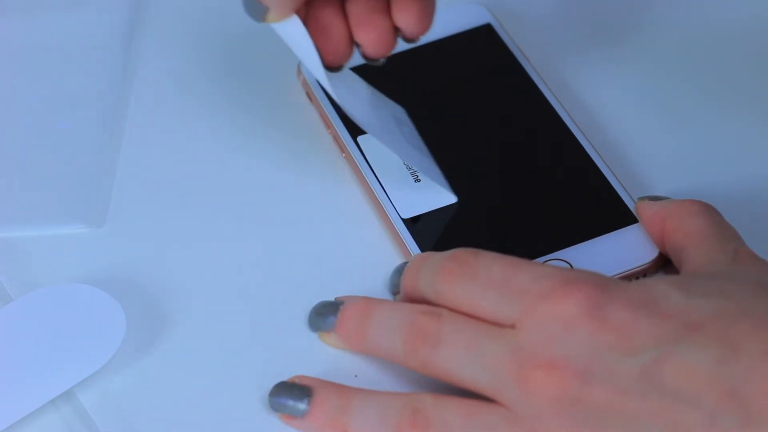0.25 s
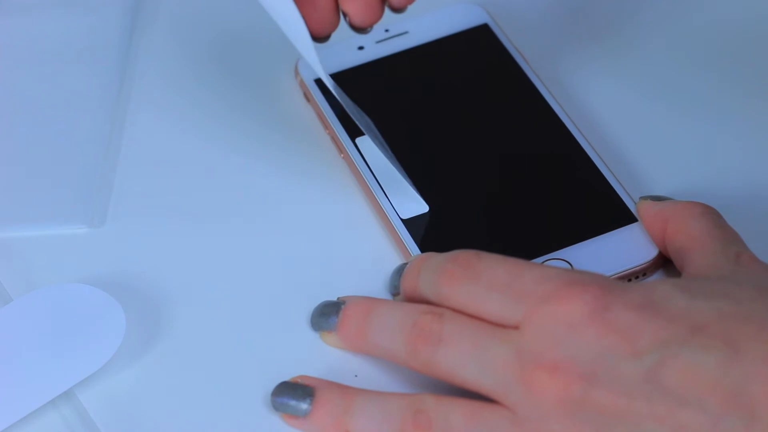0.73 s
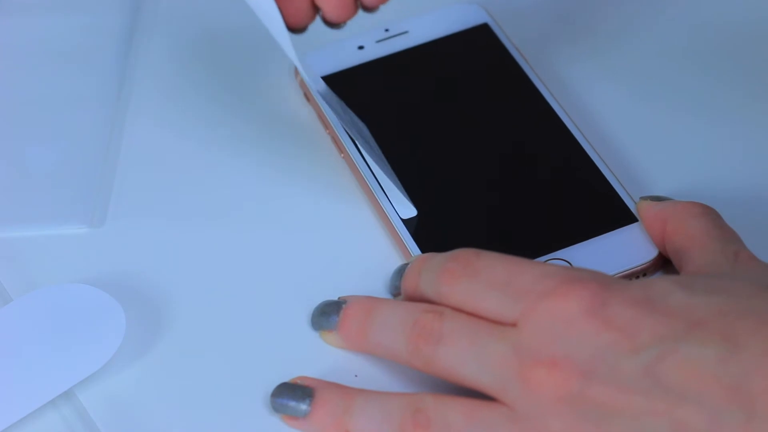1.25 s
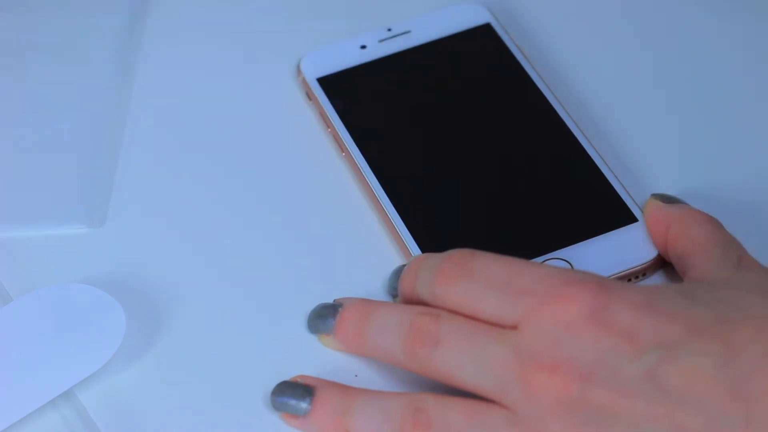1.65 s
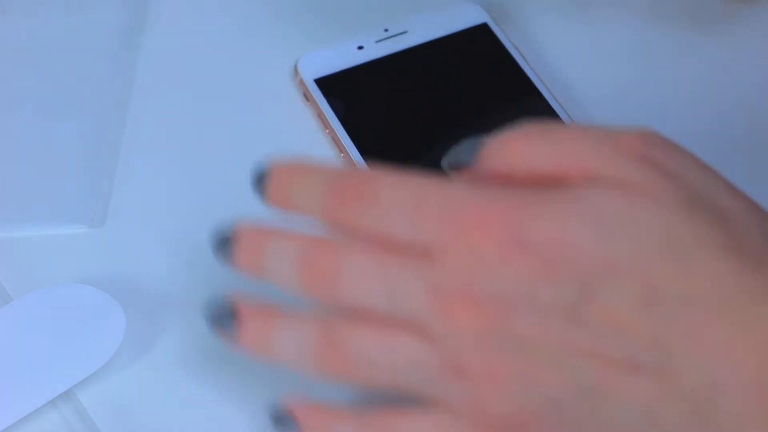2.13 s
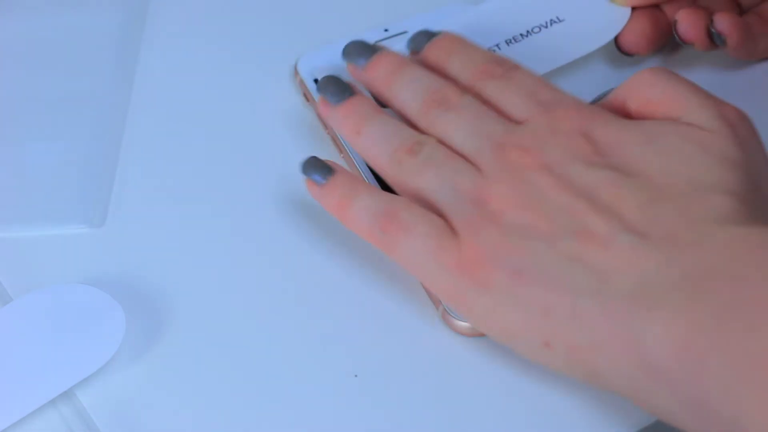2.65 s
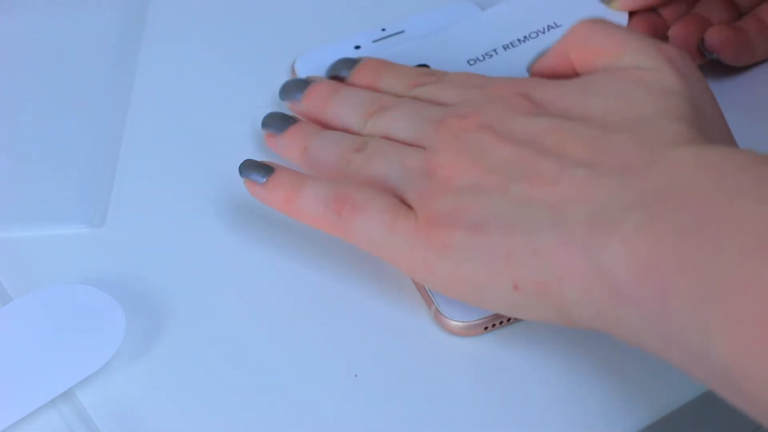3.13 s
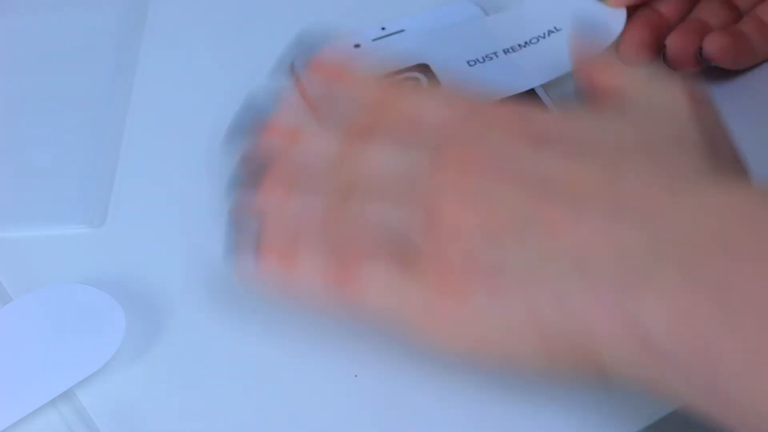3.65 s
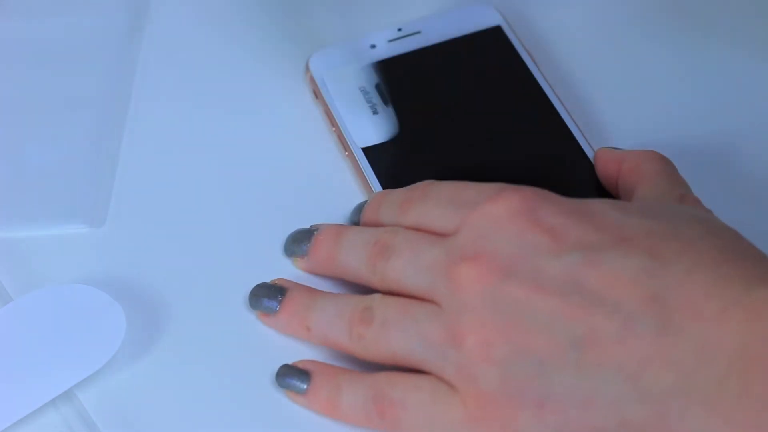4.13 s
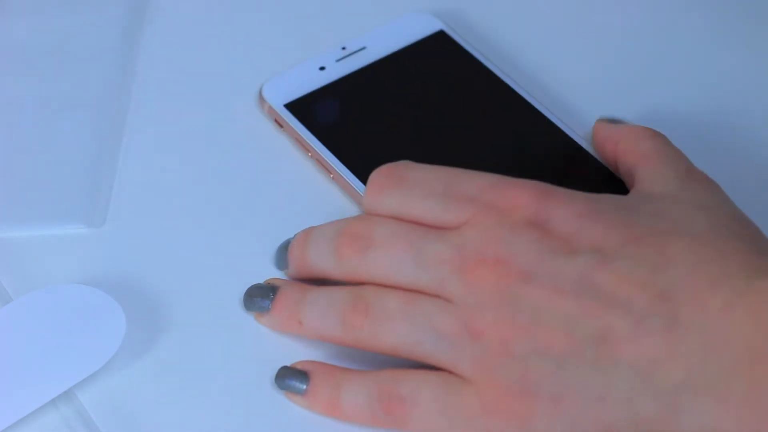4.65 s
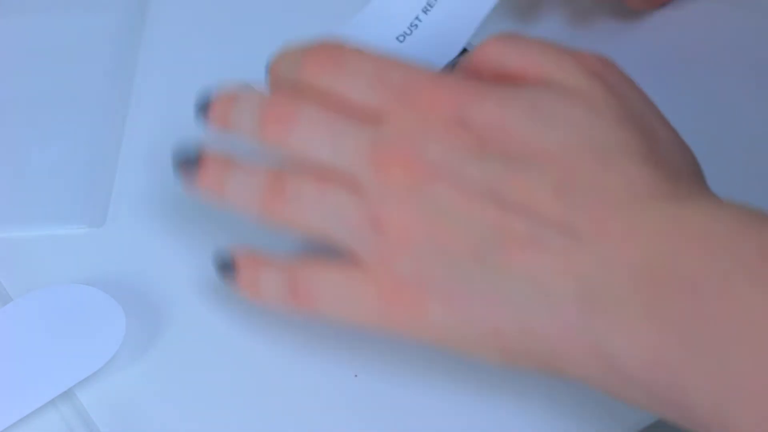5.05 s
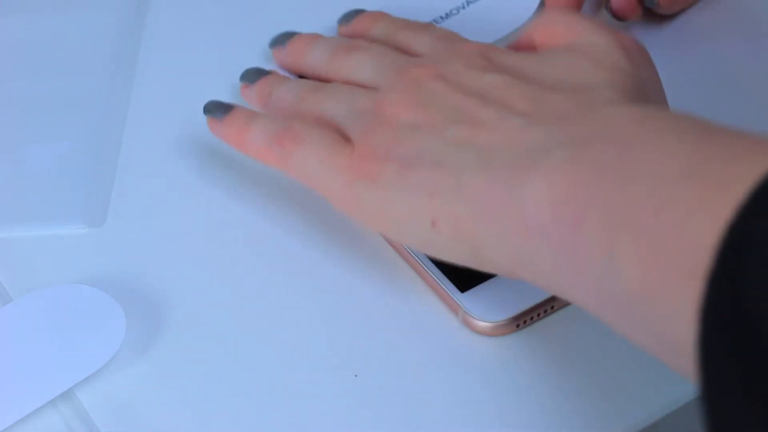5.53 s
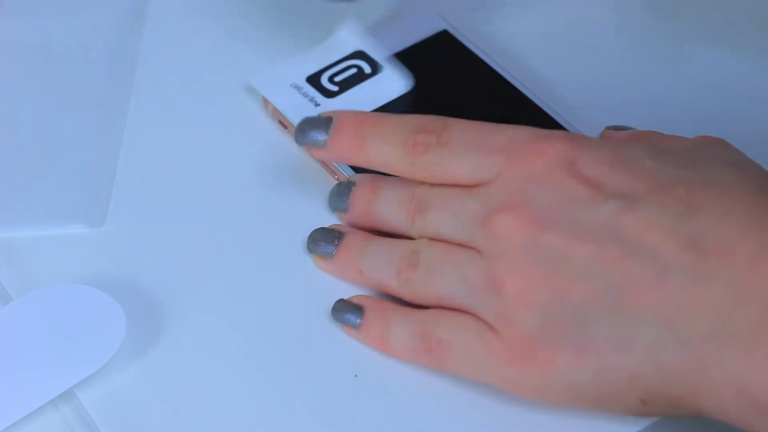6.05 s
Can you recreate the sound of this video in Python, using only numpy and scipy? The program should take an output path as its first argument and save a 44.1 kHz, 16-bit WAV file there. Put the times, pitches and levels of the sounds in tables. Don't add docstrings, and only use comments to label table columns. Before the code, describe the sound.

A phone lies on a table while a sticky sheet is pressed on and pulled off. Small ticks and one low, loud snap come first, then spaced bright knocks, each answered by short room reverb. A brief burst of dense snaps tears the sheet loose; the phone scuffs softly. More knocks lead to a second, brighter rip. Close stereo pickup, faint hiss.

```python
import sys
import numpy as np
from scipy import signal
from scipy.fft import rfft, irfft
from scipy.io import wavfile
from scipy.ndimage import uniform_filter1d

SR = 44100
rng = np.random.default_rng(int(sys.argv[2]) if len(sys.argv) > 2 else 0)


def pcm_store(signal):
    levels = np.round(np.clip(np.atleast_2d(signal), -1, 1) * 32767)
    wavfile.write(sys.argv[1], SR, levels.astype(np.int16).T)


def makeup_ratio(level_db):
    decades = np.asarray(level_db, float) / 20
    return 10 ** decades


N = 277830
LEAD = SR // 4
LONG = N + LEAD
EARLIER_S = -0.06

# start_s, rise_s, hold_s, fall_s, crackle level_db
PEELS = [
    (4.026, .045, 0.053, 0.085, -28.5),
    (5.985, 0.031, 0.19, 0.05, -31.5),
]


def at_hz(points, hz):
    table_hz, value = np.array(points).T[:2]
    return np.interp(np.log(hz + 1), np.log(table_hz), value)


def place(s):
    return int(round(s * SR)) + LEAD


def coloured(x, spectrum):
    size = x.shape[-1]
    return irfft(rfft(x) * makeup_ratio(at_hz(spectrum, np.fft.rfftfreq(size, 1 / SR))), size)


def ring(x, hz, t60):
    radius, angle = makeup_ratio(-60 / (t60 * SR)), 2 * np.pi * hz / SR
    return signal.lfilter([0, np.sin(angle)], [1, -2 * radius * np.cos(angle), radius ** 2], x + 1e-18)


def pair(size, likeness):
    alike = np.clip(at_hz(likeness, np.fft.rfftfreq(size, 1 / SR)), 0, 1)
    mid, side = rfft(rng.standard_normal((2, size)))
    mid, side = np.sqrt(1 + alike) * mid, np.sqrt(1 - alike) * side
    return irfft([mid + side, mid - side], size)


def grains(per_s, spread_db):
    present = rng.random(LONG) < per_s / SR
    size = makeup_ratio(spread_db * np.minimum(rng.exponential(1, LONG), 4))
    clicks = present * size * rng.choice([-1, 1], LONG)
    return clicks / np.std(clicks)


def stroke(t, start, rise, hold, fall):
    return np.interp(t - start, np.cumsum([0, rise, hold, fall]), [0, 1, 1, 0], left=-1, right=-1)


def envelope(strokes):
    edge_db = -11.5
    t, gain = (np.arange(LONG) - LEAD) / SR, np.zeros(LONG)
    for *shape, level_db in strokes:
        effort = stroke(t, *shape)
        gain += (effort >= 0) * makeup_ratio(level_db + edge_db * (1 - effort))
    return uniform_filter1d(gain, size=400)


def snap_rows():
    # time_s, peak_db, centre_hz, thrown_db (share thrown into the room)
    lone_snaps = [
        (.026, -31.5, 7900, -2),
        (.506, -35.5, 7760, -1),
        (.599, -32, 7800, -4),
        (1.392, -19.5, 6600, 13.5),
        (1.3957, -5.5, 2980, 1.5),
        (1.6648, -38, 5500, -6),
        (3.4647, -35.5, 5200, -5),
        (4.9059, -31.5, 3350, 6.5),
        (4.9192, -40, 3300, -6),
    ]
    # time_s, peak_db, centre_hz, thrown_db
    nail_ticks = [
        (2.869, -41, 9000, 0),
        (3.4702, -41, 5900, 7),
        (3.829, -45.5, 3600, 7.5),
        (5.365, -43, 2600, 2),
    ]
    # peak_db, centre_hz, thrown_db
    earlier_snap = (-23, 9100, 4.2)
    # time_s, peak_db, centre_hz
    first_rip = [(3.9939, -29, 7100), (3.9994, -25, 4030), (4.0103, -24.5, 4700), (4.0147, -16.5, 8000),
                 (4.0301, -19, 4800), (4.0402, -18, 12000), (4.044, -12, 4500), (4.0466, -13, 5500),
                 (4.0622, -21, 3920), (4.0636, -12.5, 4300), (4.0665, -11, 4630), (4.0933, -18, 4000),
                 (4.1198, -9.5, 6400), (4.178, -12, 12500), (4.1934, -11.5, 7840), (4.2042, -10, 8200),
                 (4.215, -8, 7700)]
    # time_s, peak_db, centre_hz
    second_rip = [(5.9714, -36, 6100), (5.9785, -29, 7600), (5.9879, -24, 13100), (5.9958, -10.5, 5070),
                  (6.0072, -21, 4430), (6.016, -11, 8400), (6.021, -12.5, 6300), (6.0289, -15, 5060),
                  (6.0528, -19, 6100), (6.061, -16, 9900), (6.072, -10.5, 10400), (6.093, -8, 10200),
                  (6.1088, -6, 9500), (6.1336, -6.5, 7200), (6.1547, -10, 3700), (6.1747, -13, 9000),
                  (6.1763, -7.5, 4600), (6.1775, -10, 5500), (6.2023, -14.5, 2350), (6.2048, -8.5, 4800),
                  (6.2307, -18, 3000)]
    thrown_full_db = (5.5, 0.5)
    slack_db = -8

    rows = [(EARLIER_S, *earlier_snap)] + list(lone_snaps) + list(nail_ticks)
    for rip, peel, full_db in zip((first_rip, second_rip), PEELS, thrown_full_db):
        for s, peak_db, hz in rip:
            pull = max(stroke(s, *peel[:4]), 0)
            rows.append((s, peak_db, hz, full_db + slack_db * (1 - pull)))
    return rows


def snaps():
    snap_ms, small_patch_hz = 0.97, 5500
    pan_spread_db = 1.2
    thrown_top = 2.2
    near, around, t = np.zeros((2, LONG)), np.zeros(LONG), np.arange(600) / SR
    rows = snap_rows()
    noise = rng.standard_normal((len(rows), 3, len(t)))
    for (s, peak_db, hz, thrown_db), (shared, left, right) in zip(rows, noise):
        ms = snap_ms * max(small_patch_hz / hz, 1)
        pan_db = pan_spread_db * left[-1]
        burst = np.array([shared + left, shared + right, 0 * t]) * 0.17 * np.exp(-1000 * t / ms)
        burst[:, 0] = 1
        band_hz = [max(hz / 3, 1300), min(4 * hz, 14500)]
        sheet = signal.butter(2, band_hz, "band", fs=SR, output="sos")
        resonance = signal.lfilter(*signal.iirpeak(hz, 2.2, SR), burst)
        shaped = signal.sosfilt(sheet, burst) + 1.2 * resonance
        shaped *= makeup_ratio(peak_db - 0.22) / np.max(np.abs(shaped[:2].mean(axis=0)))
        dull = signal.butter(1, min(thrown_top * hz, 20000), fs=SR, output="sos")
        thrown = signal.sosfilt(dull, shaped[2])
        span = slice(place(s), place(s) + len(t))
        near[:, span] += shaped[:2] * makeup_ratio(np.array([[pan_db], [-pan_db]]) / 2)
        around[span] += thrown * makeup_ratio(thrown_db + 4.5)
    return near, around


def crackle():
    # pitch_hz, density_db (per Hz)
    sheet = [(300, -9), (900, 15), (2000, -7), (4000, 16.5), (8000, 14.5), (12000, 11.5), (16000, -12)]
    clumps = uniform_filter1d(rng.standard_normal(LONG), size=70)
    clump_gain = makeup_ratio(5 * np.clip(clumps / np.std(clumps), -3, 2))
    left, right = grains(per_s=4000, spread_db=2.0), grains(per_s=4000, spread_db=2.0)
    across = np.array([left + 0.4 * right, right + 0.4 * left])
    fine = coloured(across * clump_gain, sheet)
    return envelope(PEELS) * makeup_ratio(-2.5) * fine / np.std(fine)


def phone():
    # time_s, peak_db, contact_ms
    knocks = [(.226, -33, 0.55), (.728, -34, 0.71), (1.102, -30.5, 0.47), (1.346, -21.5, 0.77),
              (1.398, -11.5, 0.29), (1.789, -34, 0.29), (2.08, -46.5, 0.21), (2.8677, -3, 0.12),
              (3.308, -37, 0.64), (3.456, -27.5, 0.083), (3.4699, -4, 0.17), (3.826, -26.5, 0.46),
              (3.935, -20.5, 0.45), (4.046, -14.5, 0.28), (4.120, -16.5, 0.055), (4.212, -33, 0.33),
              (4.9065, -36.5, 0.057), (5.3644, -3, 0.075), (5.8219, -6.5, 0.15), (6.109, -28, 0.17),
              (6.134, -17.5, 0.19), (6.177, -24, 0.11), (6.204, -36, 0.12)]
    # peak_db, contact_ms
    earlier_knock = (-19.5, 0.51)
    # pitch_hz, level_db, t60_s, side of the nodal line (+-1)
    body = [(290, -1.5, .03, -1), (620, -4, .026, -1), (830, -2, .028, 1), (1110, -10, .022, 1),
            (1520, -7, .02, 1), (1800, -7, .02, 1), (2150, -10, .016, 1), (2550, -10, .018, 1),
            (3100, -12, .018, 1), (3900, -16, .015, 1), (4600, -17, .014, 1), (7000, -18, .004, 1)]
    # pitch_hz, level_db
    body_around = [(80, 9), (150, 7.5), (300, 16), (500, 18), (800, 20), (1300, 11), (2200, 7.5), (3500, 1),
                   (6000, -6.5), (12000, -40)]
    # pitch_hz, level_db, t60_s
    table_top = [(201.5, -28, 0.14), (193.7, -21.5, 0.79)]

    push, t = np.zeros(LONG), np.arange(400) / SR
    for s, peak_db, ms in [(EARLIER_S, *earlier_knock)] + list(knocks):
        force = t * np.exp(-2000 * t / max(ms, 0.03))
        push[place(s):place(s) + len(t)] += makeup_ratio(peak_db - 7.5) * force / force.sum()
    near = np.zeros(LONG)
    for hz, level_db, t60, side in body:
        near += makeup_ratio(-4) * side * makeup_ratio(level_db) * ring(push, hz, t60)
    soft_push = uniform_filter1d(push, size=60, origin=29)
    for hz, level_db, t60 in table_top:
        near += makeup_ratio(level_db) * ring(soft_push, hz, t60)
    around = makeup_ratio(8) * np.roll(coloured(push, body_around), SR // 300)
    return near, around


def judder(strokes, spectrum, per_s):
    soft = coloured(grains(per_s, spread_db=3.0), spectrum)
    return envelope(strokes) * makeup_ratio(-7.5) * soft / np.std(soft)


def slides():
    # start_s, rise_s, hold_s, fall_s, level_db
    drags = [
        (3.815, .03, 0.012, 0.028, -46.5),
        (3.87, 0.044, 0.0073, 0.13, -46),
        (4.385, 0.05, 0.024, 0.12, -34),
    ]
    # pitch_hz, density_db (per Hz)
    drag_spectrum = [(100, -12.5), (200, -11), (400, -2.5), (700, 1.5), (1000, 0.5), (1500, -12),
                     (2500, -19), (5000, -29), (10000, -43)]
    return judder(drags, drag_spectrum, 1500)


def tugs():
    # pitch_hz, density_db (per Hz)
    tug_spectrum = [(100, -10), (200, 3.5), (350, -6), (700, 5), (1100, 0.5), (2000, -1.5), (4000, -10.5),
                    (10000, -40)]
    tug_db = (-1, -1.5)
    lag_s = 0.013
    shakes = []
    for (s, rise, hold, fall, level_db), more_db in zip(PEELS, tug_db):
        shakes.append((s + lag_s, rise, hold, fall, level_db + more_db))
    return judder(shakes, tug_spectrum, 500)


def room(x):
    # pitch_hz, t60_s
    room_t60 = [(80, 0.79), (200, 0.63), (500, 0.59), (1200, 0.69), (3000, 0.62), (7000, 0.55),
                (14000, 0.37)]
    # pitch_hz, level_db
    room_colour = [(60, -21), (130, 12.5), (300, 8), (700, -1), (1500, 6), (3000, 6.5), (6000, 2.5),
                   (11000, 2), (16000, 2.5)]
    # pitch_hz, level_db, t60_s
    room_modes = [(129.9, -9, 0.28), (329, -17, 0.67), (669, -18, 0.5), (693, -10, 0.26),
                  (914, -15.5, 0.36), (988, -16, 0.73), (1004, -17.5, 0.81)]
    # delay_s, level_db
    echoes = [
        (.0082, -7),
        (0.016, -18),
        (0.0297, -7.5),
    ]
    # pitch_hz, coherence (0 to 1; below 0 counts as 0)
    room_likeness = [(60, 1), (130, 0.97), (290, 1), (640, 0.9), (1410, 0.72), (3100, 0.21), (6820, -0.46),
                     (15000, -0.35)]
    level_room_db, build_s = -0.5, 0.0096

    size = SR
    t, hz = np.arange(size) / SR, np.fft.rfftfreq(size, 1 / SR)
    noise, tail = rfft(pair(size, room_likeness)), np.zeros((2, size))
    for centre in 40 * 2 ** np.arange(0, 9, 0.5):
        band = np.clip(1 - 2 * np.abs(np.log2((hz + 1) / centre)), 0, 1)
        decay_db = at_hz(room_colour, centre) - 60 * t / at_hz(room_t60, centre)
        tail += irfft(noise * band, size) * makeup_ratio(decay_db)
    click = np.eye(1, size)[0]
    for mode_hz, level_db, t60 in room_modes:
        tail += makeup_ratio(level_db - 0.5) * ring(click, mode_hz, t60)
    tail *= makeup_ratio(level_room_db) * (1 - np.exp(-t / build_s)) / np.sqrt(0.05 * SR)
    for s, echo_db in echoes:
        first = int(s * SR)
        tail[:, first:first + 14] += makeup_ratio(echo_db) * np.hanning(14) / 6.5
    return signal.fftconvolve(x[None], tail)[:, :LONG]


def draught():
    # start_s, rise_s, hold_s, fall_s, level_db
    gusts = [
        (5.2, 0.13, .015, .09, -63),
        (5.64, .07, .03, .27, -61),
        (6.05, 0.12, .03, .06, -71),
        (6.22, .08, .05, .05, -67),
    ]
    slow = signal.butter(3, [34, 70], "band", fs=SR, output="sos")
    air = signal.sosfilt(slow, rng.standard_normal((3, LONG)))
    return envelope(gusts) * (air[0] + 0.34 * air[1:]) / np.std(air)


def hiss():
    # pitch_hz, density_db (per Hz)
    hiss_spectrum = [(15, -32), (25, -9), (52, -11), (99, -6), (145, -4), (242, -2), (270, -6.5), (591, -6),
                     (714, -9.5), (988, -7.5), (1260, -10), (6560, -15.5), (16000, -22)]
    # pitch_hz, coherence (0 to 1; below 0 counts as 0)
    hiss_likeness = [(60, 0.39), (240, 0.18), (950, -0.0042), (3770, -0.38), (15000, -0.053)]
    noise = coloured(pair(N, hiss_likeness), hiss_spectrum)
    return makeup_ratio(-61) * noise / np.std(noise.mean(axis=0))


def scene():
    snap, snap_around = snaps()
    knock, knock_around = phone()
    fine = crackle()
    drag = slides() + tugs()
    direct = snap + knock + fine + drag
    thrown = snap_around + knock_around + fine.mean(axis=0) + drag
    capsule = signal.butter(3, 72, "high", fs=SR, output="sos")
    heard = signal.sosfilt(capsule, direct + room(thrown))
    return (heard + draught())[:, LEAD:] + hiss()


def top_cut(x):
    return signal.sosfilt(signal.butter(12, 17000, fs=SR, output="sos"), x)


def record(dry):
    low_pass = signal.cheby2(8, 30, 16300, fs=SR, output="sos")
    mix = signal.sosfilt(low_pass, dry)
    return top_cut(mix)


dry = scene()
out = record(dry)
pcm_store(out)
```